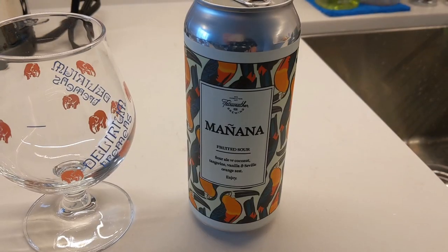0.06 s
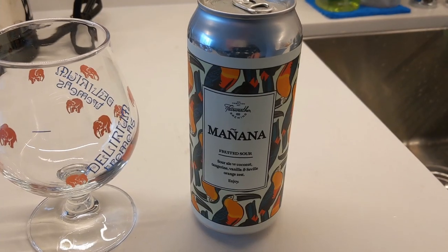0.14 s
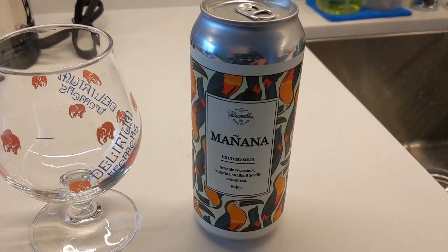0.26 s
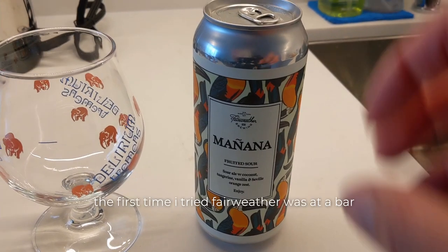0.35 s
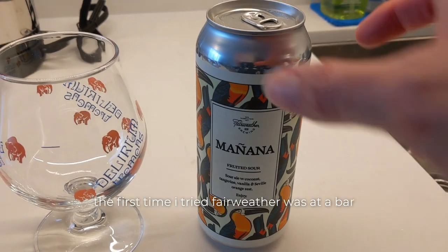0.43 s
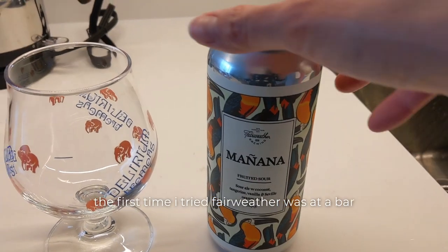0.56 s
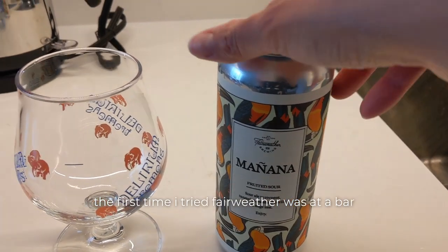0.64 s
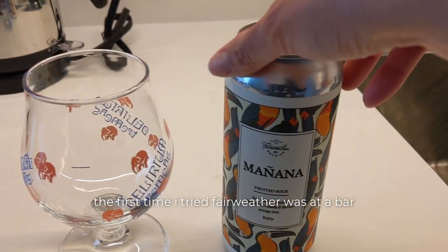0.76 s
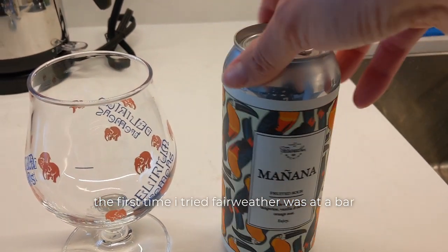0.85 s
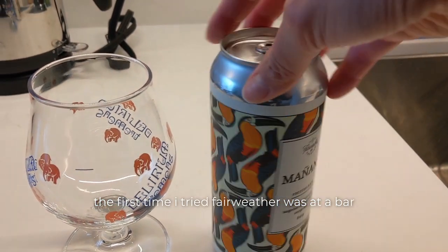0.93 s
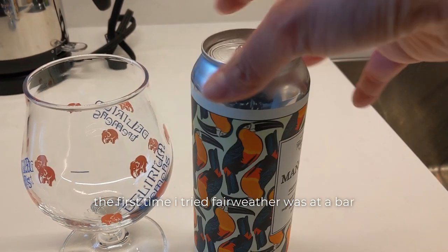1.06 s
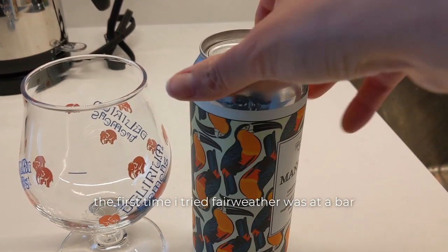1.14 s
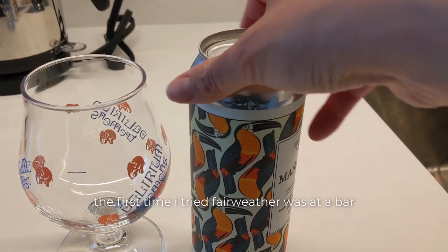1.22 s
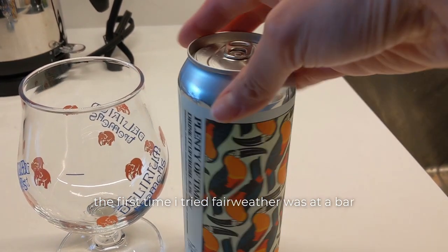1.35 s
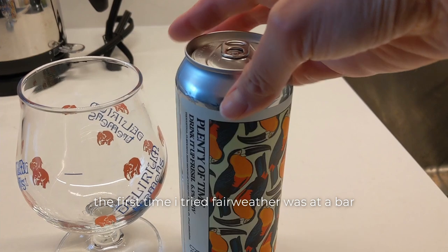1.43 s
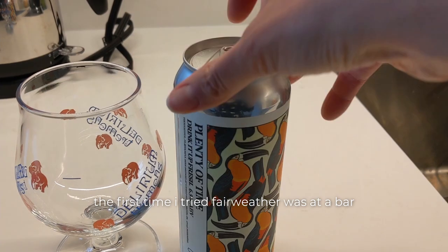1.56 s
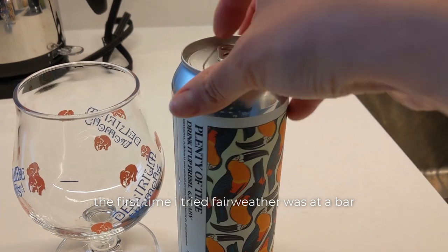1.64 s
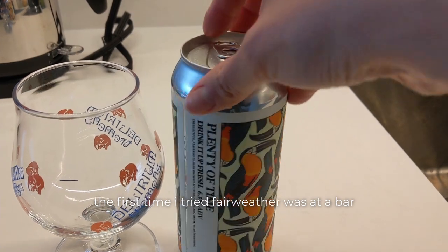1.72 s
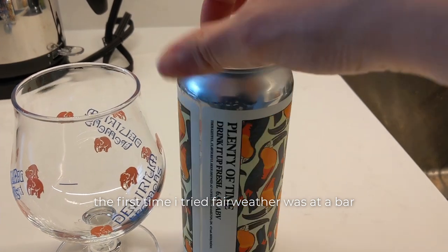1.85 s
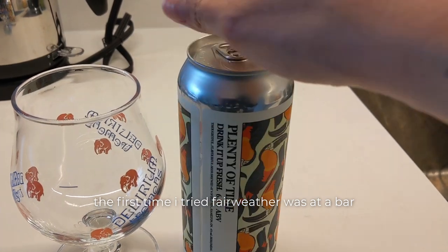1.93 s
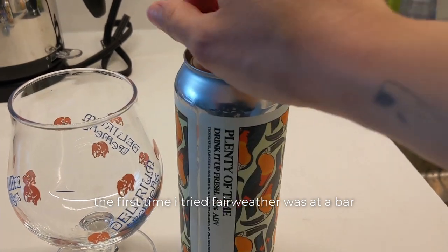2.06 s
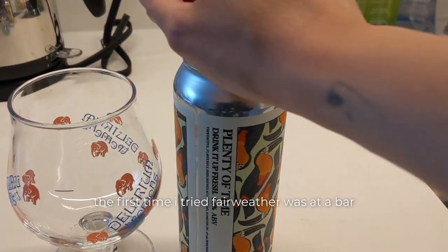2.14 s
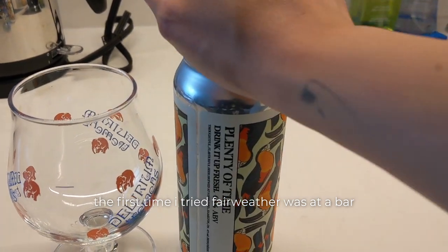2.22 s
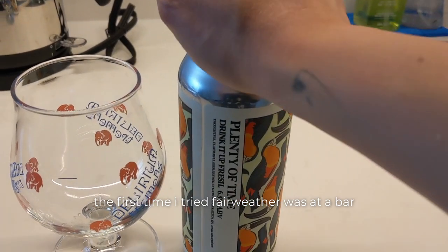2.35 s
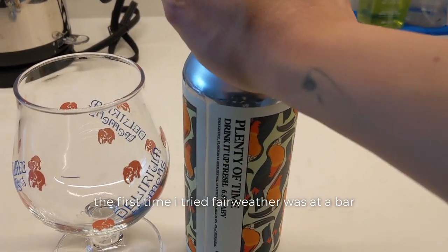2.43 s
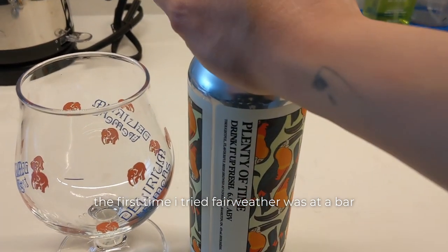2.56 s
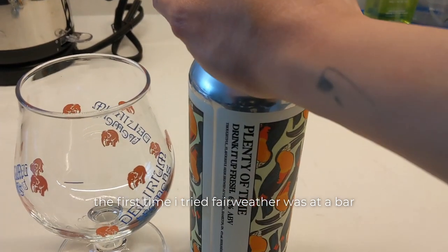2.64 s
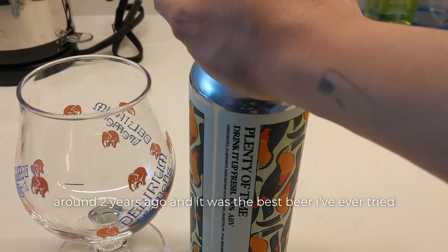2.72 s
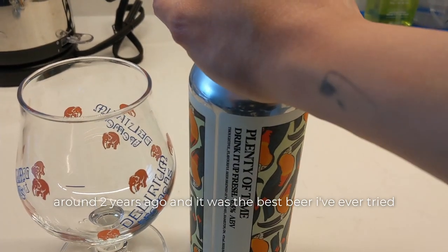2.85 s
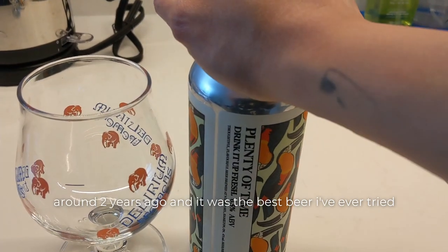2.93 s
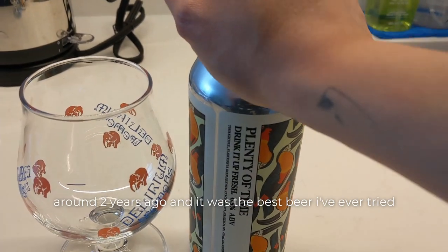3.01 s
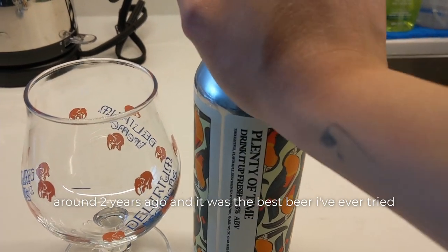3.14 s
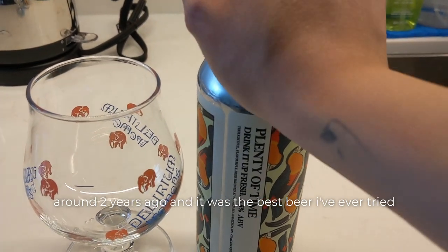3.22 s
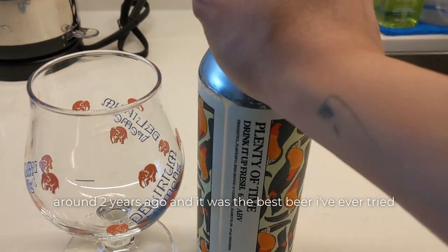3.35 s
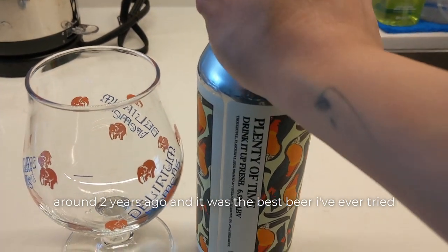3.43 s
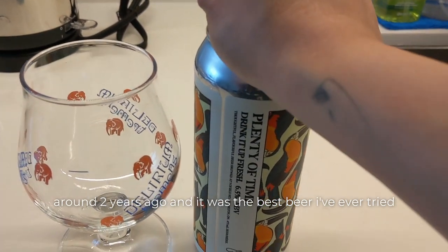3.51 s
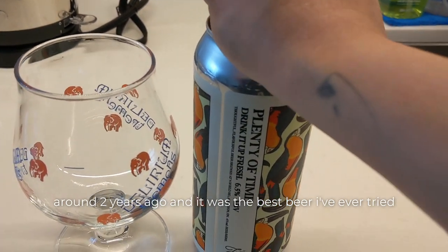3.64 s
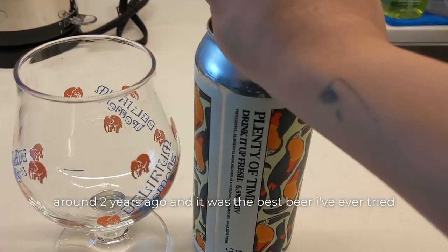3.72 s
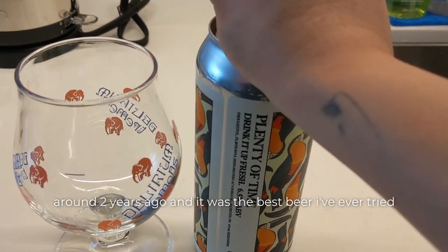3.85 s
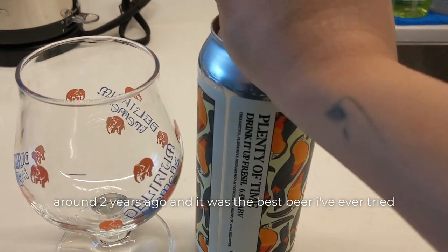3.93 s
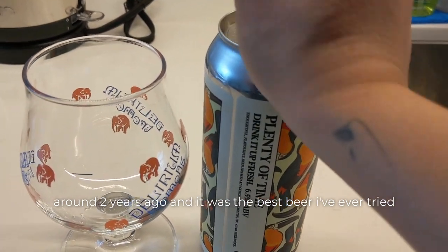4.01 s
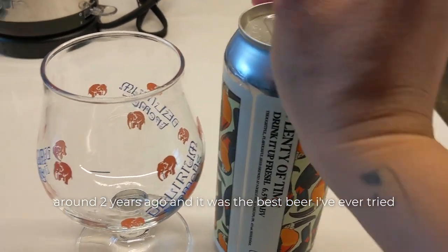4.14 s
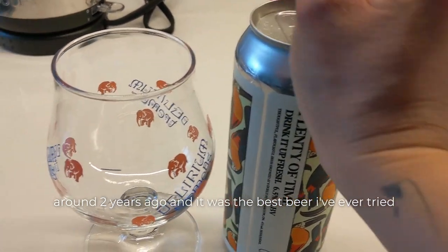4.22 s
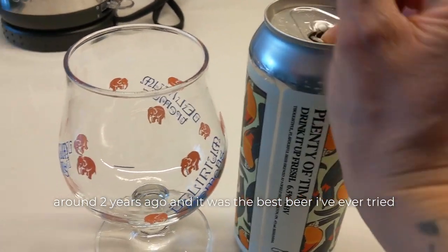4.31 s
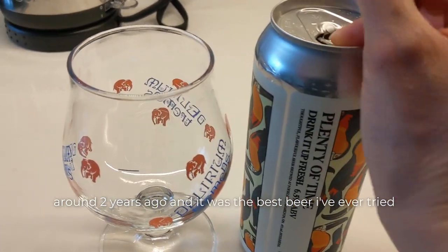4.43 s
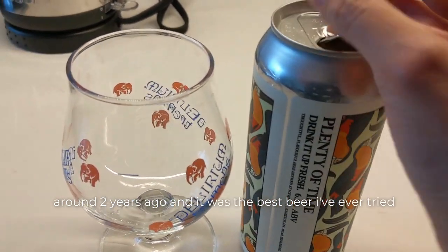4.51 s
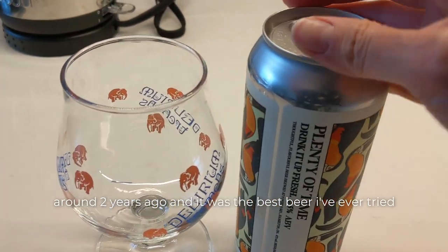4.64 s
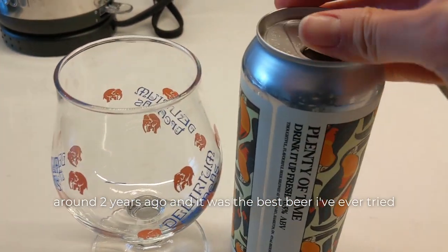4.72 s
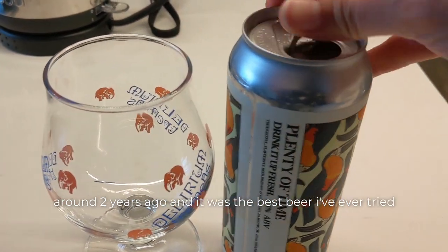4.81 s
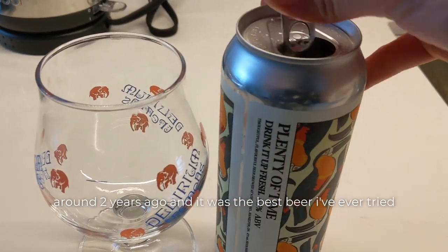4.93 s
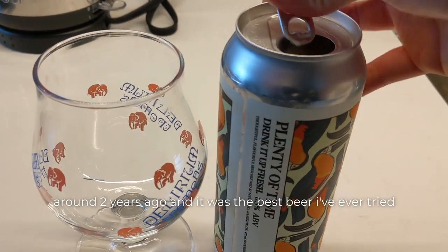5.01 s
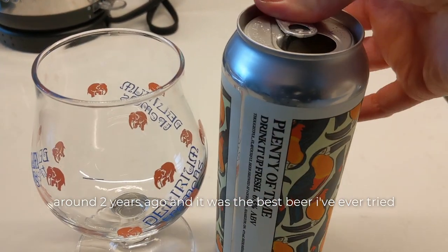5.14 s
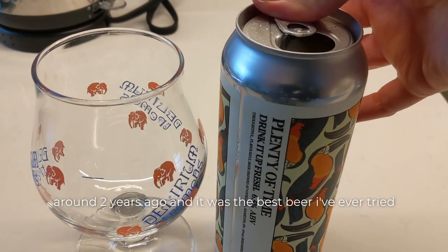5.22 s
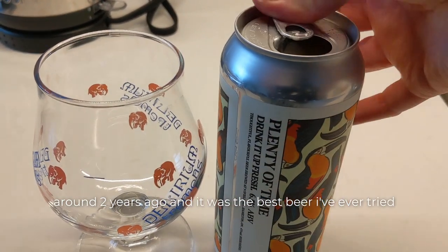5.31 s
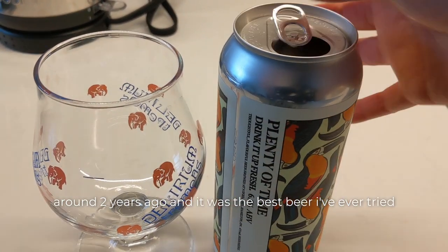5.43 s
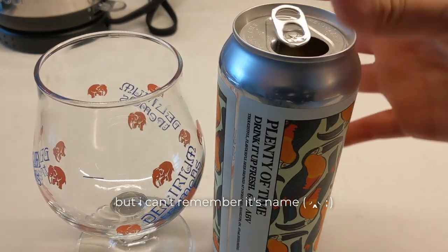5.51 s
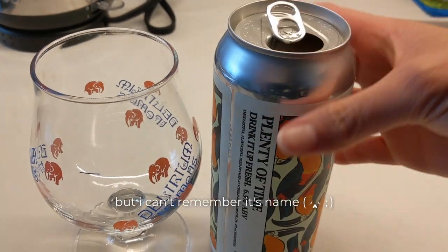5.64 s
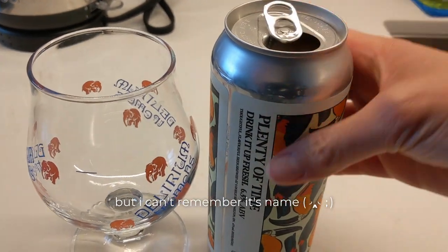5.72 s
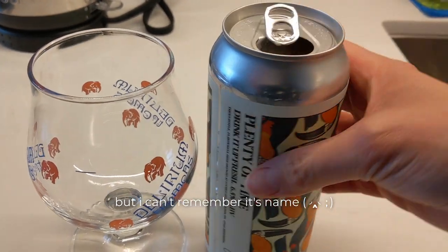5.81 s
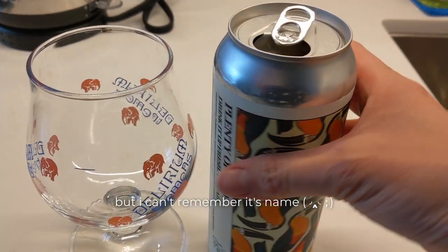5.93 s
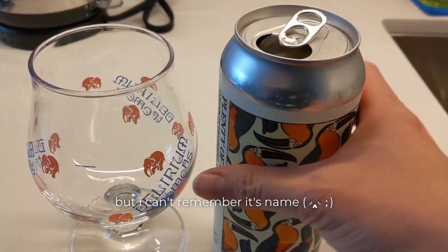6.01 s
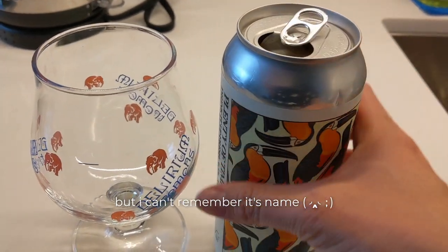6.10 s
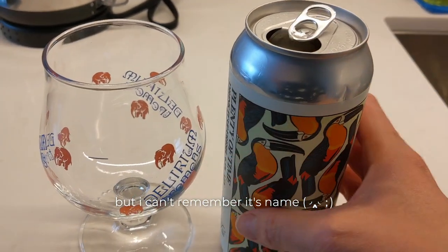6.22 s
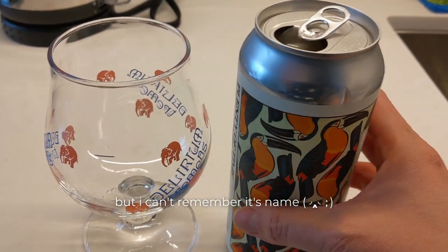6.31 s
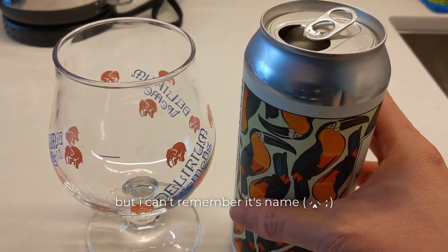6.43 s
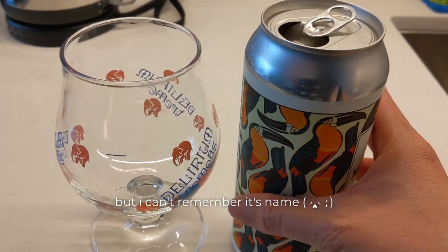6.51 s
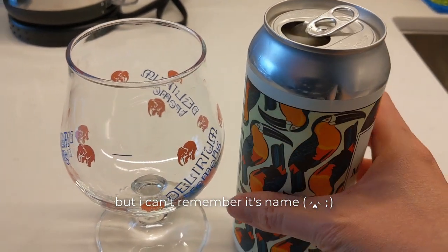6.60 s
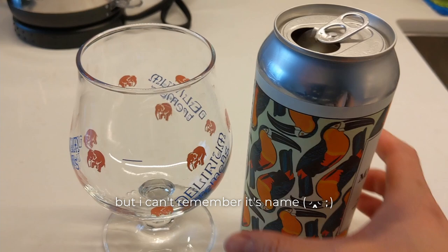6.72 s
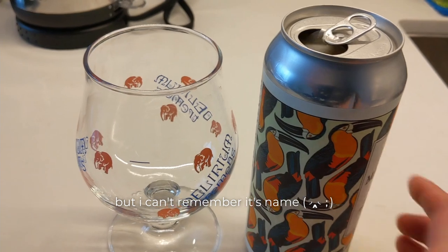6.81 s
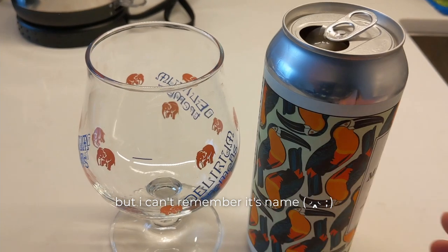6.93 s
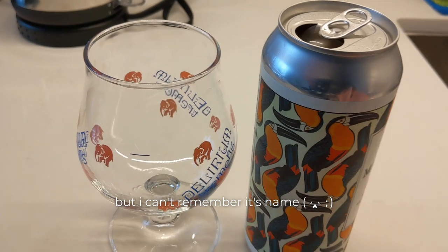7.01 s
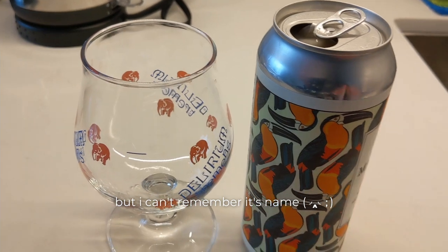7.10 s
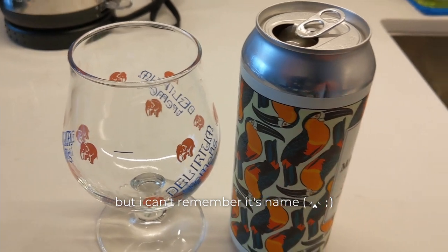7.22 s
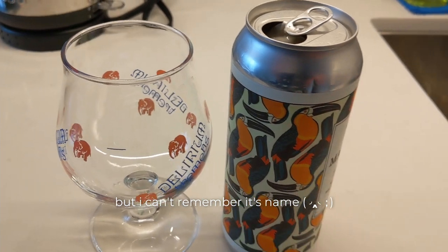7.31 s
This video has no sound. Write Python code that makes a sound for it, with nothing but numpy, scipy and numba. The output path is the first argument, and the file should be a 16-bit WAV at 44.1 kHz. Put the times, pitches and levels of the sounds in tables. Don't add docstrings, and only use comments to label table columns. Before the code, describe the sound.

Close metallic clicks and a base knock on a kitchen counter lead to a sharp can opening, a brief spurt, tab ticks and faint fizz.

```python
import sys
import numpy as np
from scipy import signal
from scipy.fft import rfft, irfft
from scipy.io import wavfile
from numba import njit

SR = 44100
rng = np.random.default_rng(int(sys.argv[2]) if len(sys.argv) > 2 else 0)


def to_linear_factor(level_db):
    exponent = np.asarray(level_db, float) / 20
    return 10 ** exponent


def transcribe(u):
    v = np.clip(np.atleast_2d(u).T, -1, 1)
    q = np.round(v * 32767).astype(np.int16)
    wavfile.write(sys.argv[1], SR, q)


N = 324576

# (frequency [Hz], density [dB per Hz])
FLOOR_SPECTRUM = [(12, -33), (20, -6), (43, -1.5), (127, -9), (210, -16.5), (285, -16.5), (574, -17.5),
                  (718, -18.5), (1290, -22.5), (1480, -25.5), (1860, -27.5), (5680, -32), (12000, -33),
                  (15700, -33), (16400, -50)]
FLOOR_DB = -63
# (frequency [Hz], correlation [-1..1, clipped])
PORT_LIKENESS = [(60, 0.39), (130, 0.6), (290, 0.91), (640, -0.019), (1410, 0.033), (3100, -0.2),
                 (6820, 0.71), (15000, -1.4)]
# (frequency [Hz], level [dB rms], t60 [s])
HUM_MODES = [(40.2, -65.5, .25), (365, -72, 0.054)]

# (loudest at [s], level [dB], length [s], brightness [dB], body [dB])
STROKES = [(0.425, -72, 0.13, -2, -1.5), (0.766, -66, 0.051, -5, -11), (0.88, -62.5, 0.047, -9, -3.5),
           (1.097, -79.5, .05, 10.5, 4), (1.271, -63.5, .03, -1, -13), (1.396, -56, 0.063, -5, -2.5),
           (1.755, -64, 0.17, -4.5, -5.5), (1.887, -72, .07, -5, -8), (2.073, -62, .04, -8, -24),
           (2.216, -63.5, 0.224, -11, -10.5), (2.342, -62.5, 0.019, -6.5, 0),
           (2.386, -72.5, 0.17, -1.5, 0.5), (4.162, -61, 0.081, 3.5, 5.5), (4.303, -65.5, 0.029, 5, -10),
           (4.364, -67.5, 0.11, 0, -4.5), (4.598, -66, 0.03, -6, 3), (4.659, -74.5, .04, 5, -6),
           (4.747, -60.5, 0.028, -3, -1), (5.222, -76, 0.016, -10, -19), (5.464, -68, 0.034, -1, 2),
           (5.822, -61.5, 0.0373, 1, -10), (6.08, -71, 0.044, -1, -30), (6.215, -70, 0.049, -3.5, -36.5),
           (6.436, -69.5, 0.03, -10, -19)]
STROKE_RISE_SHARE = 0.82
# (time [s], level [dB])
FIZZ_LEVEL = [(4.299, -95), (4.8, -68.5), (5.04, -67.5), (5.2, -63.5), (5.38, -75.5), (5.75, -72.5),
              (6.0, -63.5), (6.351, -71.5), (6.7, -66.5), (7.36, -71)]
FIZZ_BRIGHT_DB, FIZZ_BODY_DB = -5.5, -6

# (time [s], peak [dB], lid tone [Hz], tone [dB])
FLICK_EVENTS = [
    (.708, -54, 1990, -30),
    (1.0615, -36, 1955, -6),
    (1.6767, -21, 1210, -20.5),
    (1.937, -39, 1150, -12.5),
    (3.2622, -32.5, 2100, -13),
    (4.3222, -22.5, 1210, 4.5),
    (5.1744, -14.5, 1453, -8.5),
    (5.4147, -47.5, 1385, -19),
]
# (time [s], peak [dB], lid tone [Hz], tone [dB])
PICK_EVENTS = [
    (1.2447, -49, 1910, -17),
    (1.2521, -45.5, 1070, -15),
    (1.8761, -30.5, 1102, -19),
    (2.0276, -43, 1880, -40),
    (2.0457, -32.5, 1985, -25.5),
    (2.1629, -48, 2027, -1),
    (2.2499, -40.5, 1980, -13),
    (2.34, -38, 1960, -42),
]
# (time [s], peak [dB], lid tone [Hz], tone [dB])
CRACK_EVENTS = [
    (2.616, -12, 1950, -23),
    (2.7369, -20.5, 1726, -2),
    (2.8496, -14, 1720, -22.5),
    (3.575, -49, 1700, 0),
    (3.5892, -38, 1695, 0.5),
    (3.6323, -50.5, 1830, -19),
    (3.6954, -38.5, 1680, -8.5),
    (3.7042, -19, 1740, -25.5),
    (3.713, -23.5, 2000, -16),
    (3.8444, -0.5, 2017, -13),
]
# (time [s], peak [dB], lid tone [Hz], tone [dB])
CREAK_EVENTS = [
    (4.5852, -44, 1140, 5),
    (4.5973, -40.5, 1420, -0.5),
    (5.4555, -51.5, 1340, -2),
    (5.473, -45, 1460, 3.5),
]
# (time [s], peak [dB], lid tone [Hz], tone [dB])
TICK_EVENTS = [
    (2.0363, -21, 2510, -20),
    (3.0646, -13, 1250, -1.5),
    (4.1658, -25.5, 1203, -4.5),
]
# (edge brightness [dB], after-grate [dB])
CONTACT_KINDS = [
    (-18.5, -15.5),
    (-12, -16.5),
    (-12, -22),
    (-16.5, -25),
    (-2.5, -22),
]
# (frequency [Hz], level [dB])
SHELL_MODES = [(2000, -9), (3200, -12), (4500, -3), (5500, 2), (6300, -1)]

# (time [s], peak [dB], contact [ms], ringing [dB])
KNOCK_EVENTS = [
    (0.879, -31, 0.36, -30),
    (2.851, -30, 1, -16),
    (3.713, -31.5, 0.62, -13.5),
    (3.847, -39.5, 0.2, 12),
    (1.348, -39.5, 0.14, 1),
    (2.036, -50.5, 0.97, 10),
    (2.615, -40.5, 0.27, -3.5),
    (4.322, -52.5, 0.342, 2.5),
    (6.308, -45.5, 0.35, -25),
]
KNOCK_CUT_HZ = 1400
# (time [s], level [dB], contact [ms])
LANDING = (1.868, -14, 2.2)
# (frequency [Hz], level [dB], t60 [s])
BODY_MODES = [(205.7, -2.5, 0.93), (229, -9, .3), (322, -12, 0.33), (375, -5.5, .3), (430, -3.5, 0.46),
              (484, -3.5, 0.6), (553.7, -6, 0.067), (695.4, 0, 0.077), (885, -11.5, 0.22), (1102, 0, 0.07),
              (1210, -10, 0.2), (2488, -6.5, 0.044), (2850, 4, 0.08), (5820, 1.5, 0.022)]

# (loudest at [s], rise [s], fall [s], rasp [dB], rumble [dB])
TURNS = [
    (0.99, 0.075, 0.076, -46, -38.5),
    (1.373, 0.093, 0.083, -53, -46),
]
RUMBLE_SPAN = 0.54
# (frequency [Hz], level [dB], t60 [s])
RUMBLE_MODES = [(159.6, 3.5, 0.38), (331.6, 4.5, 0.66), (445, 5.5, 0.16), (697, 0.5, 0.048)]
# (frequency [Hz], level [dB], t60 [s])
RASP_MODES = [(1258, 3, 0.063), (2100, -10, 0.043), (2530, -3.5, 0.04), (2910, 4, 0.028), (3210, -2, .03),
              (5080, -8, 0.047), (5740, 9.5, 0.038), (6240, 8, 0.0039)]
# (loudest at [s], rise [s], fall [s], rasp [dB])
OPEN_TURN = (6.014, .1, .075, -58)
# (frequency [Hz], level [dB], t60 [s])
OPEN_MODES = [(1140, 0, 0.014), (1420, -2.5, 0.012), (2180, -8, .04), (3550, -7, 0.028)]

# (time [s], burst [dB], burst fall [dB per s], leak [dB], cavity [Hz])
GAS_SPURTS = [
    (2.617, -32, 900.5, -43.5, 1830),
    (2.738, -41, 899, -54.5, 1720),
    (2.85, -14, 249.5, -43, 1540),
    (3.713, -15, 651, -32, 1910),
    (3.844, -13.5, 399, -17.5, 920),
]
LEAK_FALL_DB_PER_S = 124
RIP_RISE_DB_PER_S = 1551.5
BURST_BRIGHT_DB, LEAK_BRIGHT_DB = -4, -17.5
PINHOLE_DB = 0.5
CAVITY_DB, CAVITY_SAG_SHARE, SAG_S = -9.5, 0.12, 0.042
# (frequency [Hz], density [dB per Hz])
JET_SPECTRUM = [(300, -30.5), (700, -16.5), (1200, -24.5), (1600, -2.5), (2050, 0), (2600, -4), (3300, -5),
                (4300, 5), (5500, 5), (6400, 2), (7400, -6), (10000, -31.5)]

# (frequency [Hz], t60 [s])
KITCHEN_T60 = [(100, 1), (500, 0.89), (2000, 0.9), (6000, 0.66), (15000, 0.33)]
# (frequency [Hz], gain [dB])
MIC_COLOUR = [(1000, -3.5), (2800, 3.5), (3800, 0.5), (4500, -0.5), (5700, 0.5), (6700, -1), (7600, -2),
              (9000, -7.5), (11000, 2.5), (14000, -6), (15600, -5), (16500, -39.5)]
# (frequency [Hz], left minus right [dB])
PORT_DIFFERENCE = [(60, -1), (110, -1), (200, 1), (380, 2.5), (700, 1), (1290, 2.5), (2380, 0), (4400, -10),
                   (8120, -8.5), (15000, -2)]


def rms_one(x):
    return x / np.sqrt(np.mean(x ** 2) + 1e-20)


def peak_one(x):
    return x / np.max(np.abs(x))


def at_hz(points, hz):
    table_hz, value = np.array(points).T
    return np.interp(np.log(hz + 1), np.log(table_hz), value)


def tint(x, gain_at):
    size = x.shape[-1]
    return irfft(rfft(x) * gain_at(np.arange(size // 2 + 1) * SR / size), size)


def band(x, low_hz, high_hz):
    edges_hz = [low_hz, min(high_hz, 0.45 * SR)]
    return signal.sosfilt(signal.butter(2, edges_hz, "band", fs=SR, output="sos"), x)


def drift(rate_hz):
    r = np.exp(-2 * np.pi * rate_hz / SR)
    return rms_one(signal.lfilter([1], [1, -2 * r, r * r], rng.standard_normal(N + SR))[SR:])


def ring(force, hz, t60_s):
    r = to_linear_factor(-60 / (t60_s * SR))
    w = 2 * np.pi * hz / SR
    return signal.lfilter([0, np.sin(w)], [1, -2 * r * np.cos(w), r * r], force + 1e-18)


def swell(s, rise_s, fall_s, db, order):
    t = np.arange(N) / SR - s
    return to_linear_factor(db - 12 * np.where(t < 0, -t / rise_s, t / fall_s) ** order)


def add(out, s, sound):
    at = round(s * SR)
    out[at:at + len(sound)] += sound[:N - at]


def floor():
    mid, side = tint(rng.standard_normal((2, N)), lambda hz: to_linear_factor(at_hz(FLOOR_SPECTRUM, hz)))
    mid = tint(mid, lambda hz: np.sqrt(1 + np.clip(at_hz(PORT_LIKENESS, hz), -1, 1)))
    side = tint(side, lambda hz: np.sqrt(1 - np.clip(at_hz(PORT_LIKENESS, hz), -1, 1)))
    hum = sum(to_linear_factor(db) * rms_one(ring(rng.standard_normal(N), hz, t60_s)) for hz, db, t60_s in HUM_MODES)
    return to_linear_factor(FLOOR_DB) * rms_one(np.array([mid + side, mid - side])) + hum


def brush():
    fizz = to_linear_factor(np.interp(np.arange(N) / SR, *np.transpose(FIZZ_LEVEL)))
    level, bright, body = fizz * to_linear_factor([[0], [FIZZ_BRIGHT_DB], [FIZZ_BODY_DB]])
    for s, db, length_s, bright_db, body_db in STROKES:
        stroke = swell(s, STROKE_RISE_SHARE * length_s, length_s, db, order=2)
        level = level + stroke
        bright = bright + to_linear_factor(bright_db) * stroke
        body = body + to_linear_factor(body_db) * stroke
    grain = rng.standard_normal((2, N)) * to_linear_factor(0.95 * drift(40))
    mix = level * rms_one(band(band(grain, 4200, 7600), 3800, 9000))
    mix = mix + bright * rms_one(band(grain, 6500, 16000))
    mix = mix + body * rms_one(band(grain, 2100, 5200))
    return to_linear_factor(4.0) * mix


def snaps():
    out, far, t = np.zeros(N), np.zeros(N), np.arange(SR // 4) / SR
    tables = PICK_EVENTS, CRACK_EVENTS, CREAK_EVENTS, TICK_EVENTS, FLICK_EVENTS
    rows = [row + kind for table, kind in zip(tables, CONTACT_KINDS) for row in table]
    chance = rng.standard_normal((len(rows), 20 + len(t)))
    blunt = peak_one(band((t == 0).astype(float), 3600, 8000))
    for (s, db, hz, tone_db, edge_db, grate_db), draw in zip(rows, chance):
        force = to_linear_factor(grate_db) * draw[20:] * np.exp(-t / 0.0045)
        force[0] += 1
        wall = sum(to_linear_factor(mode_db + 2 * d) * ring(force, mode_hz * (1 + 0.05 * e), 0.006)
                   for (mode_hz, mode_db), d, e in zip(SHELL_MODES, draw, draw[5:]))
        crack = peak_one(wall) + to_linear_factor(-1) * peak_one(band(force, 2800, 9000))
        split = sum(ring(force, hz * (1 + 0.025 * d), 0.16) for d in draw[12:15])
        tone = peak_one(ring(force, hz, 0.035)) + 0.2 * peak_one(split)
        edge = peak_one(band(force, 6500, 14500))
        near = crack + to_linear_factor(tone_db - 3.5) * tone + to_linear_factor(edge_db + 8.0) * edge
        add(out, s, to_linear_factor(db + 6.0) * near)
        add(far, s, to_linear_factor(db + 7.5) * (blunt + to_linear_factor(tone_db - 8.0) * tone))
    return band(band(np.array([out, far]), 1200, 21000), 1200, 19000)


def knocks():
    out, t = np.zeros(N), np.arange(SR // 2) / SR
    for s, db, contact_ms, ringing_db in KNOCK_EVENTS:
        push = band(np.exp(-t * 1000 / max(contact_ms, 0.05)), 60, KNOCK_CUT_HZ)
        body = sum(to_linear_factor(mode_db) * ring(push, hz, t60_s) for hz, mode_db, t60_s in RUMBLE_MODES[2:])
        add(out, s, to_linear_factor(db) * (peak_one(push) + to_linear_factor(ringing_db) * peak_one(body)))
    s, db, contact_ms = LANDING
    rough = rng.standard_normal(len(t))
    grate = rough * t * np.exp(-t * 1000 / contact_ms)
    grate = grate + 0.0002 * band(rough, 120, 970) * np.exp(-t / 0.044)
    body = sum(to_linear_factor(mode_db) * peak_one(ring(grate, hz, min(t60_s, 0.05 + 45 / hz)))
               for hz, mode_db, t60_s in BODY_MODES)
    clatter = band(rough * t ** 2 * np.exp(-t / 0.0064), 1400, 8600)
    shudder = band(rough, 130, 680) * (1 - np.exp(-t / 0.012)) * np.exp(-t / 0.07)
    body = body + to_linear_factor(3.0) * peak_one(clatter) + to_linear_factor(-7.5) * peak_one(shudder)
    add(out, s, to_linear_factor(db) * peak_one(band(body, 190, 10000)))
    return out


def slides():
    rasp = sum(swell(s, rise_s, fall_s, db, order=2) for s, rise_s, fall_s, db, _ in TURNS)
    rumble = sum(swell(s, RUMBLE_SPAN * rise_s, RUMBLE_SPAN * fall_s, db, order=1)
                 for s, rise_s, fall_s, _, db in TURNS)
    grit = rng.standard_normal(N) * to_linear_factor(2.65 * drift(55))

    def rung(modes):
        return rms_one(sum(to_linear_factor(db) * rms_one(ring(grit, hz, t60_s)) for hz, db, t60_s in modes))

    scrape = rung(RASP_MODES) + 0.46 * rms_one(band(grit, 2070, 12000))
    closed = to_linear_factor(3.0) * rasp * scrape + rumble * rung(RUMBLE_MODES)
    return closed + swell(*OPEN_TURN, order=1) * rung(OPEN_MODES)


def spurts():
    gain, top, thin, cavity_hz = 1e-7, 1e-8, 0, np.full(N, 1000.0)
    for k, (s, burst_db, fall_db_per_s, leak_db, hz) in enumerate(GAS_SPURTS):
        t = np.arange(N) / SR - s
        after = np.maximum(t, 0)
        is_rip = k == len(GAS_SPURTS) - 1
        build = to_linear_factor(burst_db + RIP_RISE_DB_PER_S * np.minimum(t, 0)) * is_rip
        burst = np.where(t < 0, build, to_linear_factor(burst_db - fall_db_per_s * after))
        leak = (t >= 0) * to_linear_factor(leak_db - LEAK_FALL_DB_PER_S * after)
        gain = gain + np.hypot(burst, leak)
        top = top + np.hypot(to_linear_factor(BURST_BRIGHT_DB) * burst, to_linear_factor(LEAK_BRIGHT_DB) * leak)
        thin = thin + to_linear_factor(PINHOLE_DB) * leak * (k < 2)
        sharp = CAVITY_SAG_SHARE * (k % 2 == 0) * np.exp(-after / SAG_S)
        cavity_hz = np.where(t > -0.02, hz * (1 + sharp), cavity_hz)
    return 20 * np.log10(gain), 20 * np.log10(top / gain), thin / gain, cavity_hz


@njit
def moving_ring(force, hz, r):
    out = np.zeros(len(force))
    for i in range(2, len(force)):
        out[i] = force[i] + 2 * r * np.cos(2 * np.pi * hz[i]) * out[i - 1] - r * r * out[i - 2]
    return out


def jets():
    jet_db, bright_db, thin, cavity_hz = spurts()
    white = rng.standard_normal((4, N))
    hiss = rms_one(tint(white[:3], lambda hz: to_linear_factor(at_hz(JET_SPECTRUM, hz))))
    hiss = hiss + to_linear_factor(bright_db) * rms_one(band(white[:3], 7800, 15000))
    hiss = hiss + thin * rms_one(band(white[:3], 4900, 6700))
    damping = np.exp(-np.pi * 140 / SR)
    once = moving_ring(white[3], cavity_hz / SR, damping)
    cavity = rms_one(moving_ring(once, cavity_hz / SR, damping))
    level = to_linear_factor(jet_db - 4.5 + 2 * drift(200))
    gap = level * (hiss[0] + to_linear_factor(CAVITY_DB) * cavity)
    plume = to_linear_factor(3.5) * level * hiss[1:]
    return gap, plume


def direct(x, lag_ms, scatter_ms, scatter_db):
    t = np.arange(SR // 20) / SR
    scatter = band(rng.standard_normal((2, len(t))), 5100, 10000) * np.exp(-t * 1000 / scatter_ms)
    scatter = to_linear_factor(scatter_db) * scatter / np.sqrt(np.sum(scatter ** 2) / 2)
    late = np.interp(np.arange(N) - lag_ms * SR / 1000, np.arange(N), x)
    return np.array([x, late]) + signal.fftconvolve(x[None], scatter, axes=1)[:, :N]


def kitchen(x):
    t = np.arange(SR) / SR
    edges_hz = 80 * 2 ** np.arange(0, 8.1, 0.5)
    white = rng.standard_normal((2, SR)) * (1 - np.exp(-(t / 0.0025) ** 2))
    echo = sum(band(white, low_hz, high_hz) * to_linear_factor(-60 * t / at_hz(KITCHEN_T60, low_hz * 1.2))
               for low_hz, high_hz in zip(edges_hz, edges_hz[1:]))
    return signal.fftconvolve(x[None], echo / np.sqrt(np.sum(echo ** 2) / 2), axes=1)[:, :N]


def scene():
    gap, plume = jets()
    clicks, blunt = snaps()
    low = knocks() + slides()
    close = direct(clicks + low + gap, lag_ms=0.12, scatter_ms=2, scatter_db=-7) + plume
    room = kitchen(to_linear_factor(-14.0) * blunt + to_linear_factor(-16.5) * low + to_linear_factor(-11.0) * gap)
    return tint(close + room + brush(), lambda hz: to_linear_factor(at_hz(MIC_COLOUR, hz))) + floor()


def low_pass(x):
    return signal.sosfilt(signal.butter(12, 16530, fs=SR, output="sos"), x)


def record(dry):
    left = tint(dry[0], lambda hz: to_linear_factor(0.5 * at_hz(PORT_DIFFERENCE, hz)))
    right = tint(dry[1], lambda hz: to_linear_factor(-0.5 * at_hz(PORT_DIFFERENCE, hz)))
    rounded = 0.93 * np.tanh(np.array([left, right]) / 0.93)
    return low_pass(rounded)


dry = scene()
out = record(dry)
transcribe(out)
```